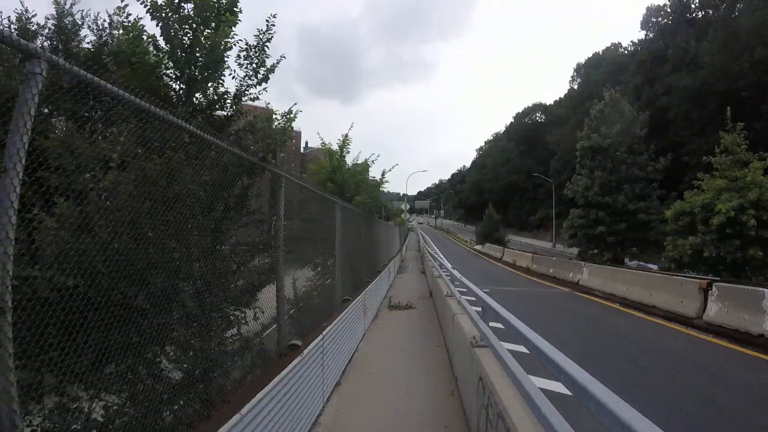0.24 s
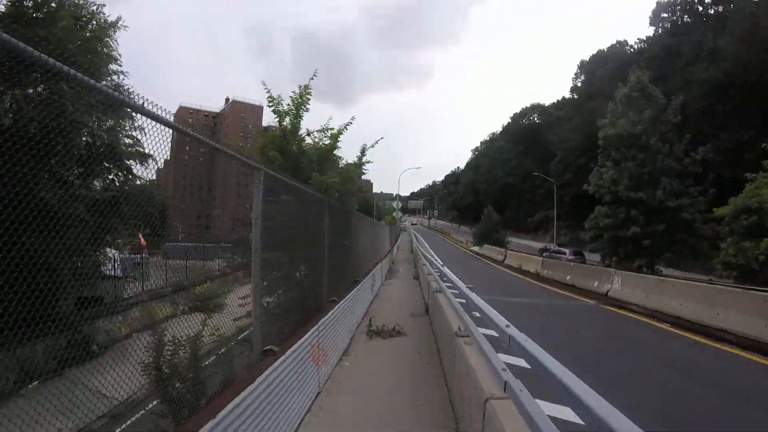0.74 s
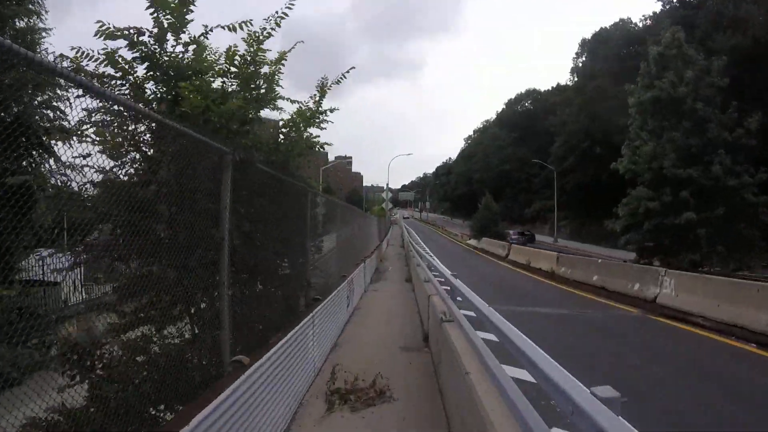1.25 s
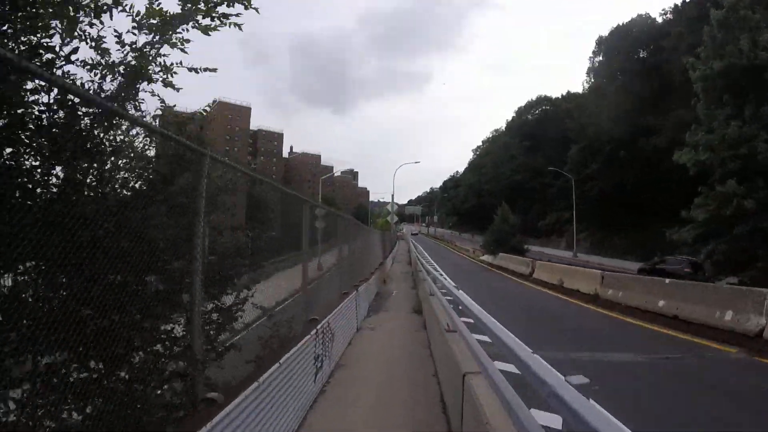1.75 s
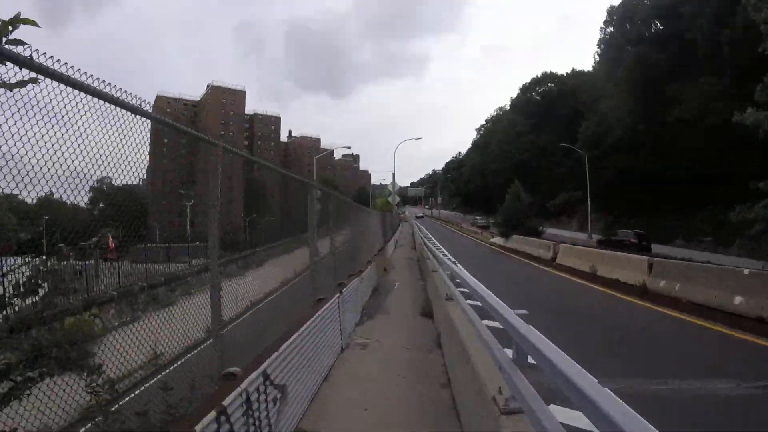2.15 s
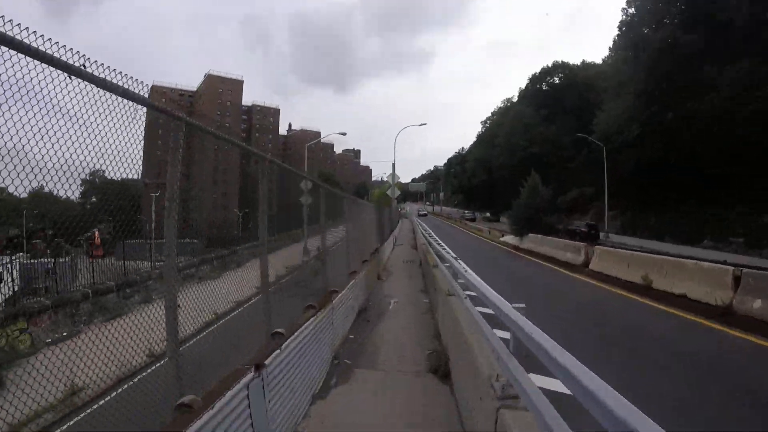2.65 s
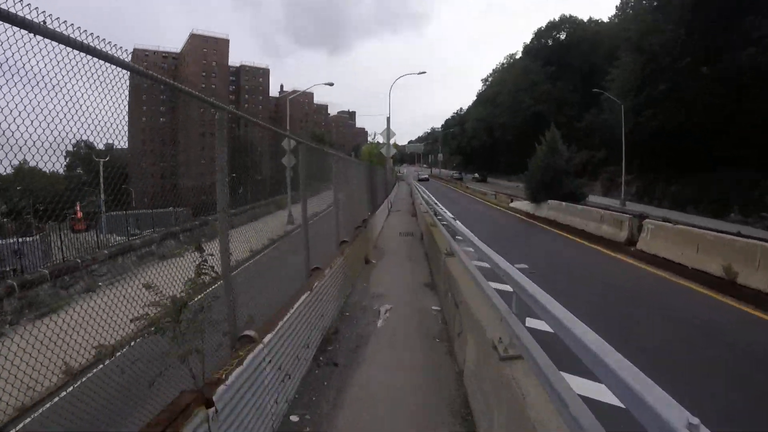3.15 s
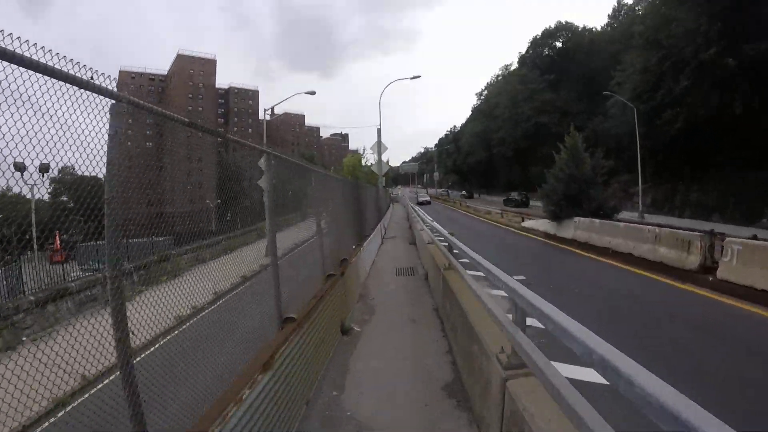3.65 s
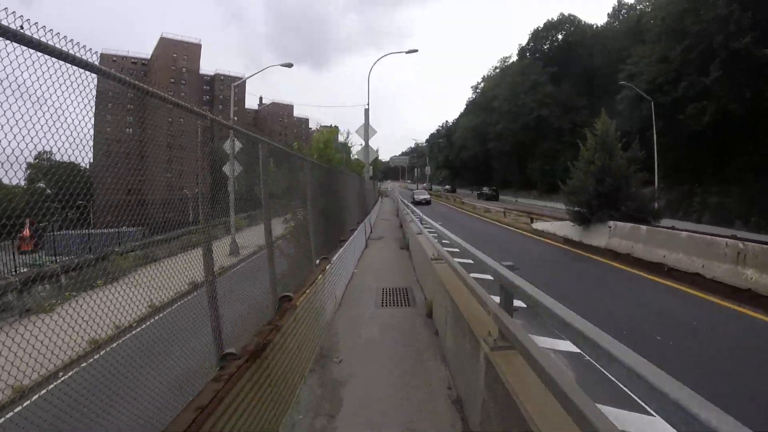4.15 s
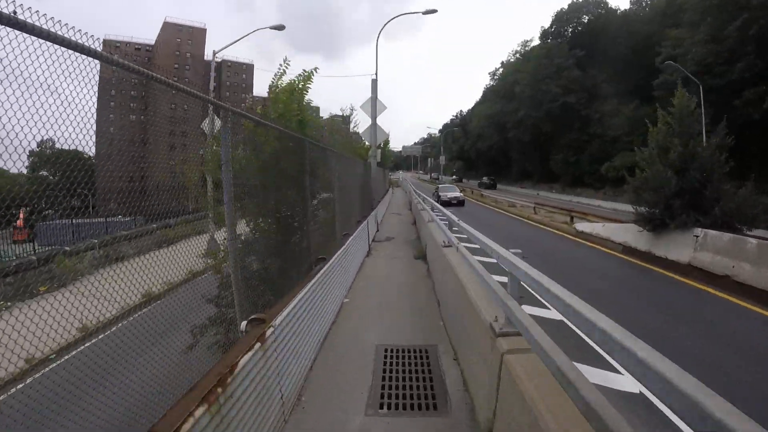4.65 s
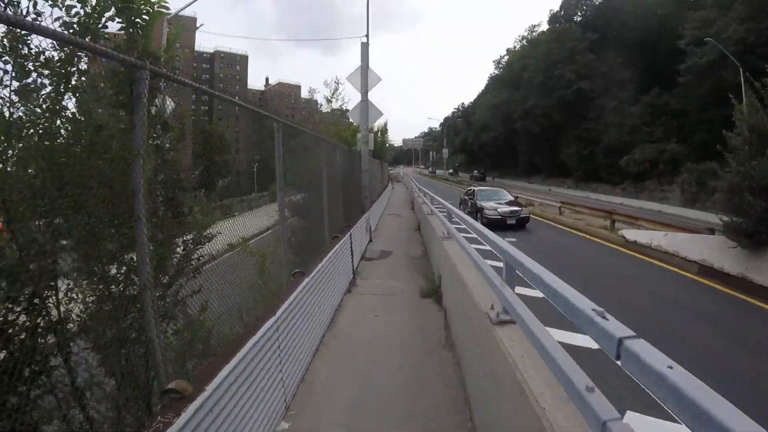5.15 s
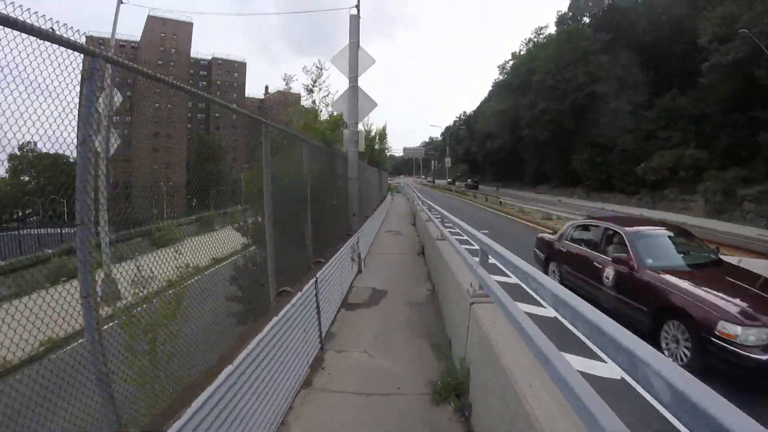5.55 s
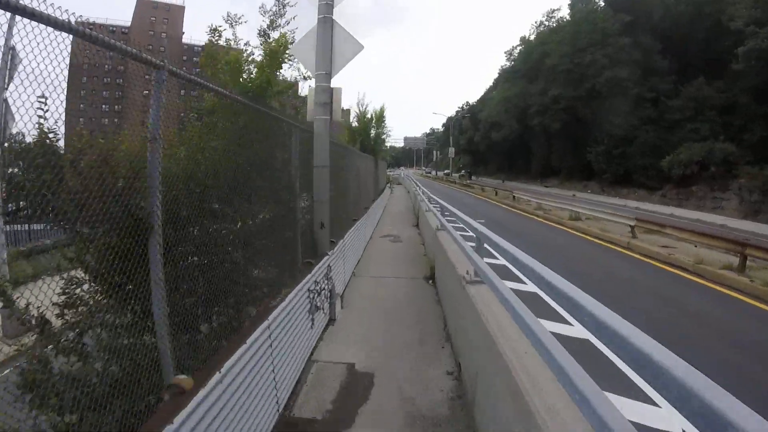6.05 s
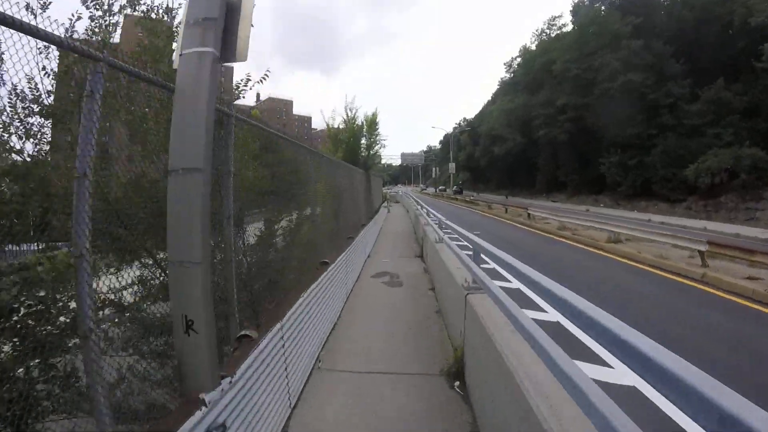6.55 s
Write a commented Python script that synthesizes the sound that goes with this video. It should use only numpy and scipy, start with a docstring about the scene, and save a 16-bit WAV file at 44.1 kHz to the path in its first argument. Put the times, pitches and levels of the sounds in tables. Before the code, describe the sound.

Muffled bike-mounted ride beside a highway: bassy tyre rumble, rattling clicks and thuds, a passing car's swell, then a violent double knock.

```python
"""On a concrete path beside a highway a bicycle rolls along, heard through a camera in a plastic case on the bike.
Shaped noise makes the tyre rumble, the traffic wash, a car passing the other way and brief hisses.
Decaying modes of frame, case and bracket make thuds, clicks, taps, grit and one hard double jolt at a slab joint.
Two faint chirps are swept sines with an echo; a limiter ducks the loudest peaks and recovers slowly."""
import sys
import numpy as np
from scipy import signal
from scipy.fft import rfft, irfft, next_fast_len
from scipy.io import wavfile
from scipy.ndimage import uniform_filter1d, minimum_filter1d, map_coordinates

SR = 44100
rng = np.random.default_rng(int(sys.argv[2]) if len(sys.argv) > 2 else 0)


def wav_record(signal):
    """Record a signal, one row per channel, as 16-bit PCM in the file named by sys.argv[1]."""
    frames = np.transpose(np.atleast_2d(signal))
    bounded = np.clip(frames, -1, 1)
    # unit amplitude maps onto the largest positive 16-bit level
    quanta = np.round(bounded * 32767).astype(np.int16)
    wavfile.write(sys.argv[1], SR, quanta)


N = 300321
T = np.arange(N) / SR  # seconds
RING_T = np.arange(SR // 5) / SR  # time axis of one struck sound, seconds

# clicks of the loose mount falling back: click_s, level_db, flight_ms (2 or less: no lifting tick)
MOUNT_CLICKS = [(.199, -37.5, 0), (.302, -30.5, 7), (.358, -33.5, 0), (.421, -34, 5.5), (.543, -30, 5.5),
                (.657, -29, 5.5), (.754, -29, 7), (.873, -30, 8.5), (.983, -30, 8.5), (1.249, -32, 8.5),
                (1.515, -32.5, 9.5), (1.738, -28.5, 5.5), (2.204, -32.5, 13), (2.277, -38, 0.0034),
                (2.406, -31, 11), (2.617, -31.5, 10.5), (2.901, -34, 13), (3.265, -33.5, 0),
                (3.375, -33.5, 0.0042), (3.478, -30, 0.0041), (3.523, -37.5, 8), (3.747, -32.5, 0.0032),
                (3.835, -38.5, -5), (4.093, -37, 0.0043), (4.457, -38.5, 0), (4.607, -36, 0),
                (5.076, -32.5, 4), (5.208, -33.5, 0), (5.22, -36, 0.0059), (5.275, -34.5, 0.0031),
                (5.425, -36, 0.0051), (5.604, -28.5, 0), (6.047, -31, 0.0036), (6.211, -35.5, 0),
                (6.397, -32, 0), (6.613, -36.5, 0)]


def amp(db):
    """Level law: decibels to amplitude gain."""
    return 10 ** (np.asarray(db) / 20)


def unit(x):
    """Normalisation: x scaled to rms 1."""
    return x / np.sqrt(np.mean(x ** 2) + 1e-20)


def curves(rows):
    """Linear interpolation: one value per sample for each column after the time."""
    s, *columns = np.transpose(rows)
    return [np.interp(T, s, column) for column in columns]


def wobble(rate):
    """Slow random modulation: a smooth curve through random knots, rate of them a second."""
    knots = rng.standard_normal(int(N * rate / SR) + 4)
    return map_coordinates(knots, [T * rate])


def filtered(x, response):
    """Linear filtering: the spectrum of x times a response of frequency."""
    size = next_fast_len(N + 8192)
    spectrum = rfft(x, size) * response(np.fft.rfftfreq(size, 1 / SR))
    return irfft(spectrum, size)[:N]


def noise(spectrum):
    """Coloured noise: white noise filtered to the given (hz, db) spectrum, at rms 1."""
    f, db = np.transpose(spectrum)

    def colour(hz):
        return amp(np.interp(np.log(hz + 1), np.log(f), db))

    return unit(filtered(rng.standard_normal(N), colour))


def add(track, s, sound):
    """Superposition: mix a sound into the track at time s."""
    part = track[max(0, round(s * SR)):][:len(sound)]
    part += sound[:len(part)]


def ring(modes, colour, scatter_db, detune, attack, size):
    """Modal decay: damped sines vary at each blow; the loudest stretch of size samples has rms 1."""
    hz, db, t60 = np.transpose(modes)[:, :, None]
    t = RING_T[RING_T < 2 * t60.max()]
    level, pitch = rng.standard_normal((2, len(modes), 1))
    decay = amp(db + scatter_db * level - 60 * t / t60)
    waves = colour(hz) * decay * np.sin(2 * np.pi * hz * (1 + detune * pitch) * t)
    x = waves.sum(0) * (1 - np.exp(-t / attack))
    loudest = np.sqrt(uniform_filter1d(x ** 2, size).max())
    return np.pad(x / loudest, (0, len(RING_T) - len(t)))


def traffic():
    """Broadband radiation: highway wash plus a near car that swells and crossfades to its brighter rear."""
    # distant highway: time_s, level_db
    road = [(0, -51), (.7, -51.5), (1.2, -53), (2.9, -52.5), (3.4, -51), (4.4, -53)]
    # oncoming car: time_s, level_db, rear_share (0-1, of the power)
    passing_car = [(4.3, -74, 0), (4.8, -57, 0), (5.2, -52.5, 0.4), (5.55, -46.5, 0.6), (5.8, -44, 0.6),
                   (6.05, -47, 1), (6.3, -50, 0.96), (6.55, -55.5, 1), (6.8, -60, 0.9)]
    # noise colours, case included: frequency_hz, relative_db
    wash_colour = [(500, -11), (900, -9), (1150, -8), (1420, 0.5), (1700, -3), (2000, 0), (2280, -8),
                   (2600, -4), (3200, -10), (4000, -14.5), (5000, -23.5), (6400, -23), (9000, -29.5),
                   (15000, -40)]
    front_colour = [(200, -27), (800, -8.5), (1150, -7), (1480, 4.5), (2000, -4), (2300, -9), (2700, -6),
                    (3500, -11), (5000, -45), (12000, -41)]
    rear_colour = [(300, -10), (900, -12), (1400, -7.5), (1750, -3), (2000, 1.5), (2280, -7), (2650, -4.5),
                   (3200, -12.5), (4100, -13), (5000, -30.5), (6400, -23), (8000, -39), (14000, -53)]
    road_db, = curves(road)
    car_db, rear = curves(passing_car)
    rear = np.clip(rear, 0, 1)
    wash = amp(road_db + 0.76 * wobble(20)) * noise(wash_colour)
    car = np.sqrt(1 - rear) * noise(front_colour) + np.sqrt(rear) * noise(rear_colour)
    return wash + amp(car_db) * car


def hisses():
    """Band-limited noise: narrow bands of hiss that swell and fade."""
    # brief hisses: start_s, end_s, centre_hz, width_hz, level_db
    bands = [(2.697, 2.77, 3900, 500, -57.5), (2.793, 3.028, 3840, 700, -61.5),
             (2.94, 3.42, 2680, 1210, -54.5), (2.964, 3.41, 7850, 1200, -75), (5.846, 6.3, 2560, 300, -58),
             (5.982, 6.253, 1930, 250, -52), (6.0, 6.4, 6200, 1200, -72)]
    out = np.zeros(N)
    for start, end, centre_hz, width_hz, db in bands:
        band = unit(filtered(rng.standard_normal(N),
                             lambda hz: 1 / (1 + (2 * (hz - centre_hz) / width_hz) ** 4)))
        progress = np.clip((T - start) / max(end - start, .005), 0, 1)
        swell = np.sqrt(np.abs(np.sin(np.pi * progress)))
        out += amp(db) * swell * band
    return out


def chirps(echo_db=-10, echo_t60=0.6):
    """Frequency modulation: short, slightly rough swept whistles with a faint outdoor echo."""
    # thin chirps: start_s, length_s, start_hz, middle_hz, end_hz, level_db
    whistles = [(1.956, 0.073, 3870, 4040, 3870, -55.5), (2.035, 0.067, 4130, 3840, 3570, -53)]
    out = np.zeros(N)
    for s, length, start_hz, middle_hz, end_hz, db in whistles:
        u = np.clip((T - s) / length, 0, 1)
        glide = np.polyfit([0, .5, 1], [start_hz, middle_hz, end_hz], 2)
        hz = np.polyval(glide, u) * (1 + 0.0074 * wobble(500))
        swell = amp(db + 4.2 * wobble(90)) * np.sqrt(np.abs(np.sin(np.pi * u)))
        out += swell * np.sin(2 * np.pi * np.cumsum(hz) / SR)
    tail = rng.standard_normal(len(RING_T)) * amp(-60 * RING_T / echo_t60)
    echo = signal.fftconvolve(out, tail / np.linalg.norm(tail))[:N]
    return out + amp(echo_db) * echo


def shaking():
    """Forced vibration: the path's shaking in dB about its mean, and that mean."""
    # shaking of the bike by the path: time_s, level_db (before the rumble's trim)
    roughness = [(0.05, -36.5), (0.35, -44.5), (0.8, -39.5), (1.07, -40.5), (1.5, -42), (2.7, -41.5),
                 (3.17, -44.5), (3.63, -40.5), (3.76, -42.5), (4.25, -42), (4.93, -50), (5.1, -48),
                 (5.26, -40), (5.57, -35), (5.79, -41.5), (6.04, -46), (6.34, -35.5), (6.81, -44.5)]
    level_db, = curves(roughness)
    return level_db - level_db.mean(), level_db.mean()


def tyres(rumble_db=-0.5, hum_db=-53, hum_follows=0.097):
    """Rough-surface excitation: a lumpy rumble surges with each mount click, over a steadier rolling hum."""
    # noise colours: frequency_hz, relative_db
    rumble_colour = [(12, 3.5), (25, 5.5), (45, -2.5), (72, 2), (100, -8.5), (150, -15), (300, -24),
                     (450, -29.5), (900, -48), (2000, -100)]
    hum_colour = [(40, -33), (100, 4), (200, -2), (330, -2), (480, -9), (750, -10.5), (1050, -8),
                  (2000, -24), (5000, -72)]
    surge_db, surge_lag_s, surge_s = -7, 0.0073, 0.192  # re click level; pulse centre after click; length
    shake_db, mean_db = shaking()
    power = amp(mean_db + shake_db + rumble_db) ** 2
    swell = np.hanning(round(surge_s * SR)) ** 2
    for s, db, _ in MOUNT_CLICKS:
        add(power, s + surge_lag_s - surge_s / 2, amp(db + surge_db) ** 2 * swell)
    lumpy = unit(noise(rumble_colour) * amp(2.3 * wobble(25)))
    hum = amp(hum_db + hum_follows * shake_db + 0.94 * wobble(30)) * noise(hum_colour)
    return np.sqrt(power) * lumpy + hum


def thud(tilt_db, scatter_db=3, cushion_hz=480):
    """Modal response of the frame: tilt (dB per octave) weights its modes; the tyre cushions the edge."""
    # frame and mount: frequency_hz, relative_db, t60_s
    frame_modes = [(70, -3, 0.1), (101, -1, 0.1), (166, -4, 0.06), (231, -3.5, 0.042), (297, 6.5, 0.034),
                   (315, -3.5, 0.056), (614, -6.5, 0.027)]
    x = ring(frame_modes, lambda hz: amp(tilt_db * np.log2(hz / 100)), scatter_db,
             detune=0.027, attack=0.000067, size=400)
    return signal.sosfilt(signal.butter(2, cushion_hz, fs=SR, output="sos"), x)


def knock(contact_hz):
    """Contact stiffness: in the case's ring a soft contact builds up slowly and leaves upper modes still."""
    # plastic case: frequency_hz, relative_db, t60_s
    case_modes = [(1040, -18, 0.0028), (1192, -11.5, 0.015), (1500, -3, 0.0095), (1632, -5.5, 0.026),
                  (1844, -1, 0.015), (2034, -3, 0.022), (2468, 2, 0.012), (2658, 3, 0.01), (2955, 1, 0.014),
                  (3515, -7.5, 0.018), (4560, -25, 0.044)]
    sense = (-1) ** np.arange(len(case_modes))[:, None]  # neighbouring modes move in opposite senses
    return ring(case_modes, lambda hz: sense / np.sqrt(1 + (hz / contact_hz) ** 10),
                scatter_db=2.56, detune=0.012, attack=0.19 / contact_hz, size=80)


def snap():
    """Hard impact: plastic meeting plastic gives a treble ring and a brief crackle."""
    # short treble ring of the case: frequency_hz, relative_db, t60_s
    treble_modes = [(4255, 7, 0.0075), (5270, -6, 0.0085), (6040, 2.5, 0.011), (6610, -2, 0.016),
                    (8550, 6, 0.0055), (10340, 3.5, 0.0049), (10900, 2.5, 0.0054), (14600, -3, 0.0035)]
    crackle = np.diff(rng.standard_normal(len(RING_T) + 2), n=1)
    crackle = crackle[1:] + crackle[:-1]  # neither bass nor extreme treble
    crackle = crackle * amp(-16.5 - 60 * RING_T / 0.012)
    treble = ring(treble_modes, np.ones_like, scatter_db=2.5, detune=0.03, attack=0.00047, size=40)
    return 0.95 * treble + crackle


def tick(ring_db=7.5):
    """Light, hard contact in the mount: a bright edge plus the case's ring."""
    return snap() + amp(ring_db) * knock(contact_hz=4500)


def grit(count=130, faintest_db=-54, range_db=11.5, follows=0.35):
    """Random impacts: grit under the tyres sends faint taps up the frame, stronger where the path is rough."""
    out = np.zeros(N)
    shake_db, _ = shaking()
    for when, weight, hardness in rng.random((count, 3)):
        db = faintest_db + range_db * weight ** 2 + follows * shake_db[int(when * N)]
        add(out, when * N / SR, amp(db) * knock(contact_hz=1500 + 1500 * hardness))
    return out


def fidget(count=22, faintest_db=-64, range_db=9):
    """Random micro-impacts: the mount never quite rests and ticks faintly at random times."""
    out = np.zeros(N)
    for when, weight in rng.random((count, 2)):
        add(out, when * N / SR, amp(faintest_db + range_db * weight) * tick())
    return out


def scrape(count=9, edge_db=-17):
    """Friction as a train of impacts: something gritty drags under a tyre in a quick run of hard grains."""
    # one scrape: start_s, length_s, grain_level_db
    drag = (3.651, .028, -39)
    start, length, db = drag
    out = np.zeros(N)
    for k, slip in enumerate(rng.random(count)):
        grain = knock(contact_hz=5000) + amp(edge_db) * snap()
        add(out, start + length * (k + slip) / count, amp(db) * grain)
    return out


def rattle():
    """Impact excitation: bumps thud in the frame, the loose mount clicks and taps; harder clicks are brighter."""
    # small bumps in the path: time_s, level_db, tilt_db_per_octave
    bumps = [(.002, -24, -9), (.342, -30, -15), (0.603, -20.5, -7.5), (0.611, -23.5, -7),
             (.647, -23.5, -11.5), (0.837, -30, -7), (0.855, -25, -13), (0.956, -29, -9),
             (1.243, -30.5, -11), (1.733, -34, -7), (1.928, -37, -7), (2.275, -34.5, -8),
             (2.544, -31, -5.5), (3.41, -31, -24), (3.478, -34, -8), (3.659, -34, -9.5), (3.693, -25, -15),
             (4.06, -33, -12), (5.195, -37, -13.5), (5.379, -36, -10)]
    # the mount slips and stays put: time_s, level_db
    slips = [(.076, -51), (1.115, -52), (1.949, -51), (2.08, -51.5), (3.094, -49.5), (3.561, -54),
             (3.703, -45.5), (4.049, -49.5), (4.239, -49.5), (4.294, -52), (4.721, -49), (5.484, -49),
             (5.575, -46.5), (6.167, -47.5), (6.273, -48.5), (6.37, -52), (6.799, -51.5)]
    # softer taps on the case: time_s, level_db
    taps = [(.003, -24.5), (0.603, -39), (0.616, -29), (.631, -41), (.819, -33), (.861, -35), (.939, -37.5),
            (.959, -38), (1.707, -41.5), (2.717, -40), (3.399, -35.5), (3.633, -41), (4.484, -35.5),
            (6.029, -37), (6.374, -38), (6.658, -33)]
    lift_db = -17.5  # lifting tick, relative to the click that follows
    usual_edge_db, usual_click_db = -14, -29.5  # bright edge relative to the ring, at the usual click level
    edge_growth = 0.41  # extra dB of edge for each dB above the usual click
    out = np.zeros(N)
    for s, db, tilt_db in bumps:
        add(out, s, amp(db) * thud(tilt_db))
    for s, db, flight_ms in MOUNT_CLICKS:
        if flight_ms > 2:
            add(out, s - flight_ms / 1000, amp(db + lift_db) * tick())
        edge_db = usual_edge_db + edge_growth * (db - usual_click_db)
        add(out, s, amp(db) * (knock(contact_hz=4540) + amp(edge_db) * snap()))
    for s, db in slips:
        add(out, s, amp(db) * tick())
    for s, db in taps:
        add(out, s, amp(db) * knock(contact_hz=1660))
    return out


def crack(t60=0.026, low_hz=930, high_hz=2900):
    """Transient noise: a dry decaying burst, muffled by the case to a middle band."""
    burst = rng.standard_normal(len(RING_T)) * amp(-60 * RING_T / t60)
    return signal.sosfilt(signal.butter(4, [low_hz, high_hz], "bandpass", fs=SR, output="sos"), burst)


def jolt(stop_db=-10, crack_db=3):
    """Hard-stop impact: a slab joint kicks the wheel; the mount hits its bracket, slaps back and chatters."""
    # blows: time_s, frame_db, tilt_db_per_octave, case_db, contact_cutoff_hz, snap_db
    blows = [(5.6383, 1, 4, -8, 2310, -50), (5.6518, -6, -13.5, -20, 2300, -70),
             (5.6905, -4, -0.5, -3.5, 3400, -33), (5.695, -12.5, -4, -16.5, 3200, -26),
             (5.706, -12.5, 0, -25, 3300, -52), (5.7111, -14, 2, -15.5, 3840, -31),
             (5.717, -12.5, -4, -38, 2000, -54)]
    # bracket, reached only when the mount bottoms out: frequency_hz, relative_db, t60_s
    bracket_modes = [(1050, -19, 0.032), (1084, -9, 0.041), (1383, 5.5, 0.023)]
    out = np.zeros(N)
    for s, frame_db, tilt_db, case_db, contact_hz, snap_db in blows:
        bracket = ring(bracket_modes, np.ones_like, scatter_db=1, detune=.01, attack=.0015, size=80)
        add(out, s, amp(frame_db) * thud(tilt_db) + amp(snap_db) * snap())
        case = knock(contact_hz) + amp(stop_db) * bracket + amp(crack_db) * crack()
        add(out, s, amp(case_db) * case)
    return out


def scene():
    """Superposition: everything reaches one microphone inside the case."""
    background = traffic() + hisses() + chirps()
    bicycle = tyres() + grit() + fidget() + scrape() + rattle() + jolt()
    return (background + bicycle)[None]


def limiter(x, ceiling_db, release_db):
    """Gain control: peaks over the ceiling pull the gain down; it recovers by release_db a second."""
    over_db = np.maximum(20 * np.log10(np.abs(x) + 1e-9) - ceiling_db, 0)
    cut_db = np.maximum.accumulate(over_db + release_db * T) - release_db * T
    lowest_gain_db = minimum_filter1d(-cut_db, size=41)
    return x * amp(uniform_filter1d(lowest_gain_db, size=41))


def record(dry, top_hz=15600):
    """Limiting and band limitation: the camera limits the loudest peaks and cuts steeply above top_hz."""
    held = limiter(dry[0], ceiling_db=0.0, release_db=19)
    return filtered(held, lambda hz: 1 / np.sqrt(1 + (hz / top_hz) ** 100))[None]


dry = scene()
out = record(dry)
wav_record(out)
```